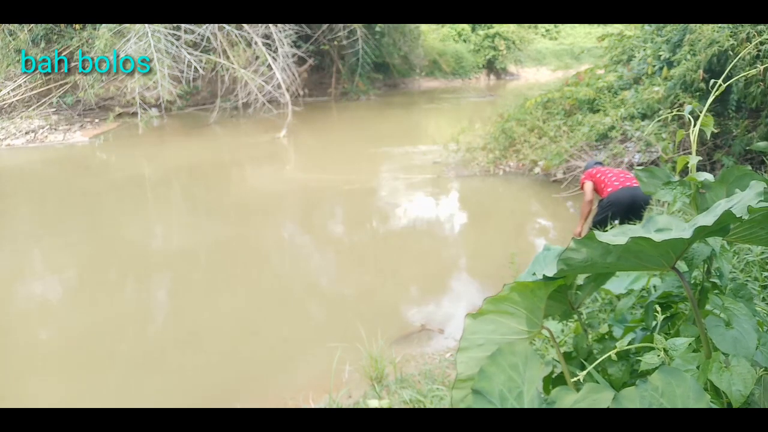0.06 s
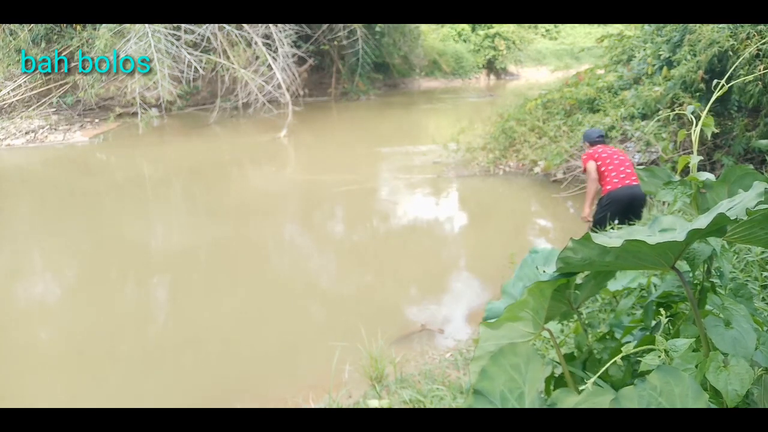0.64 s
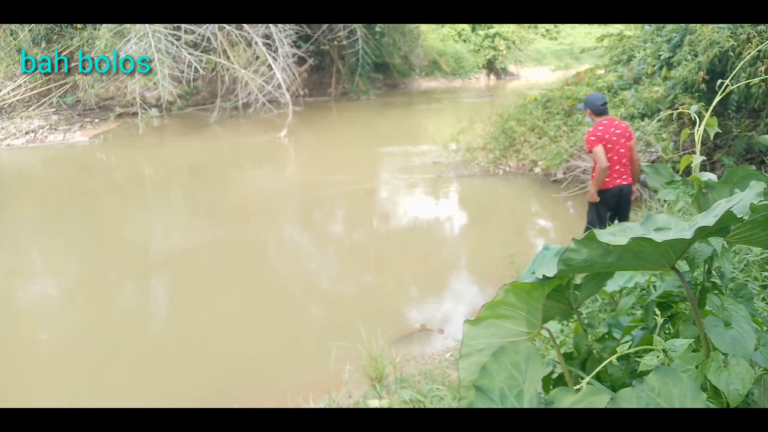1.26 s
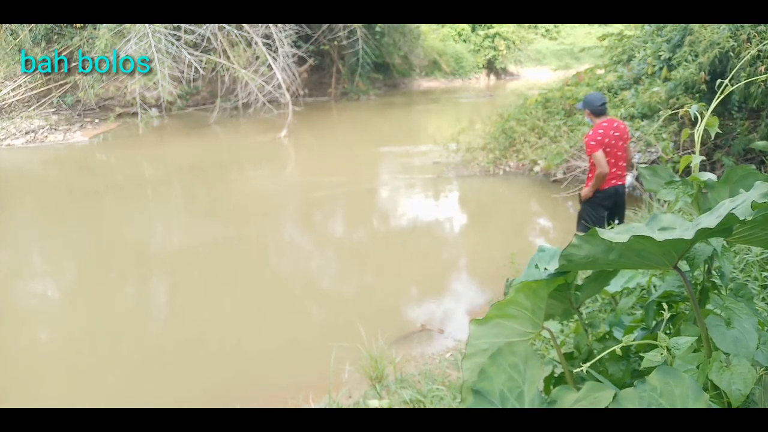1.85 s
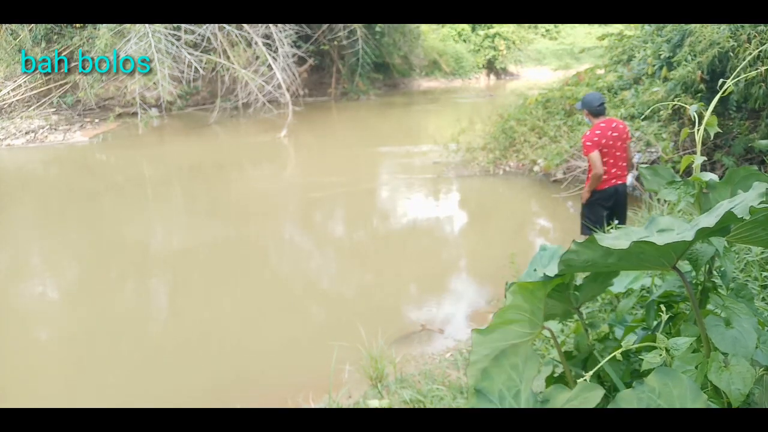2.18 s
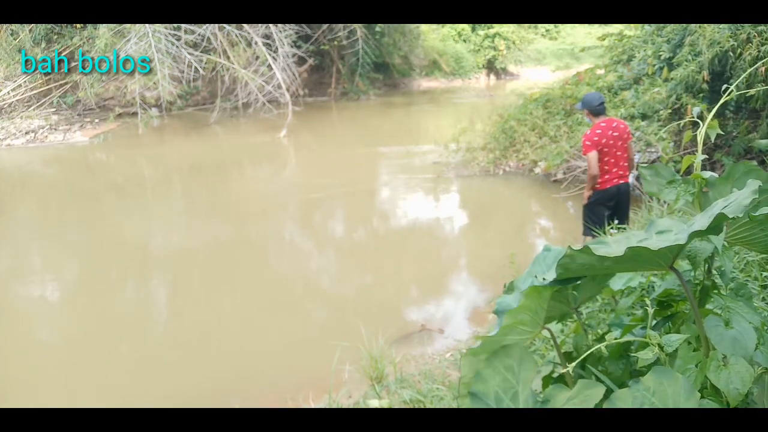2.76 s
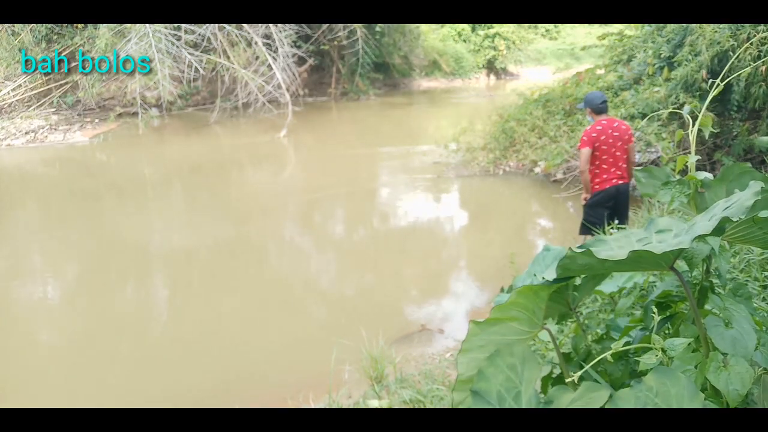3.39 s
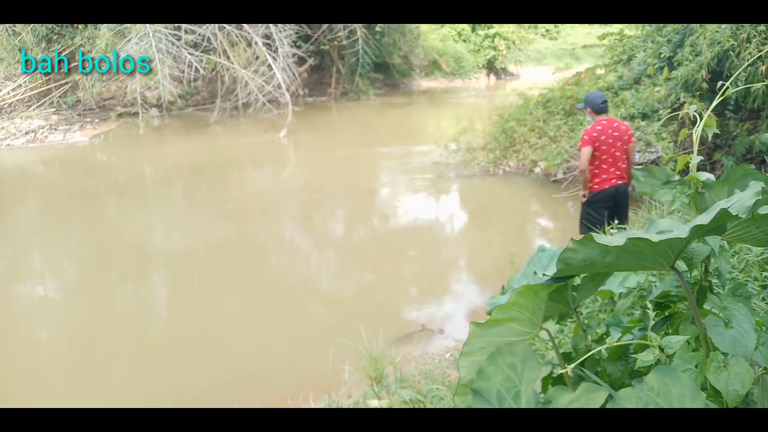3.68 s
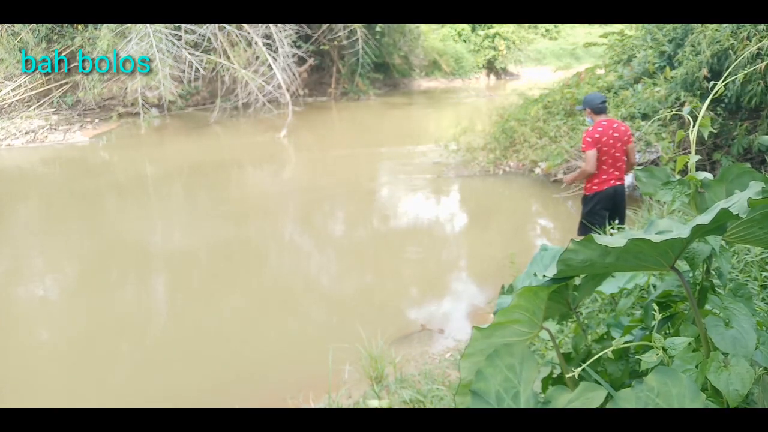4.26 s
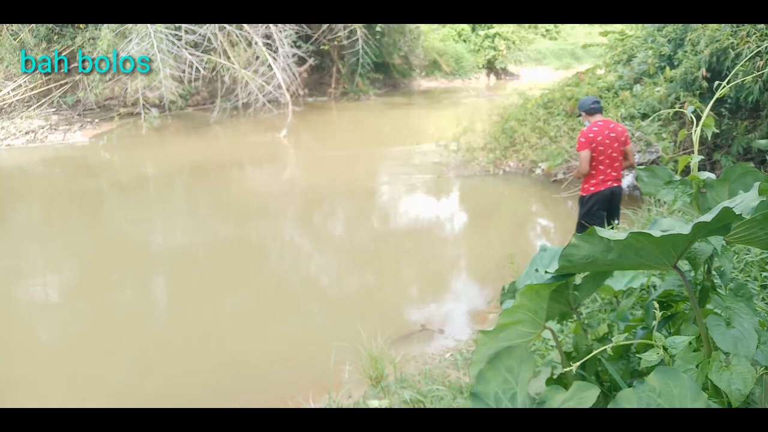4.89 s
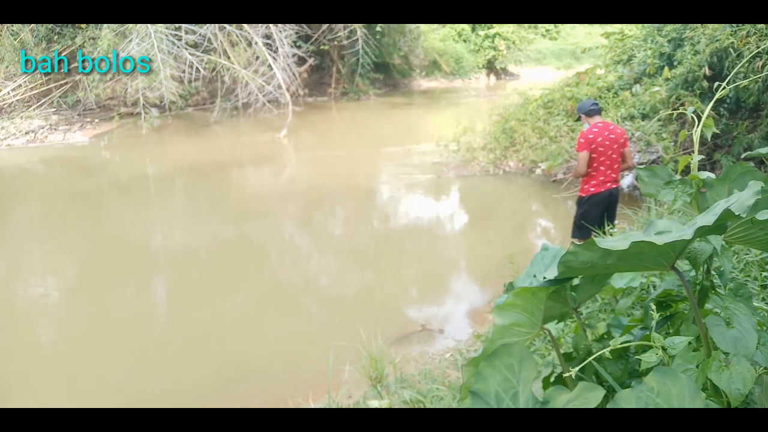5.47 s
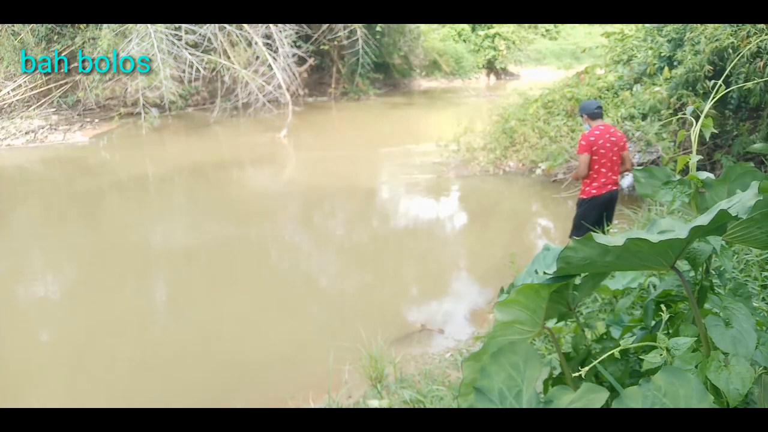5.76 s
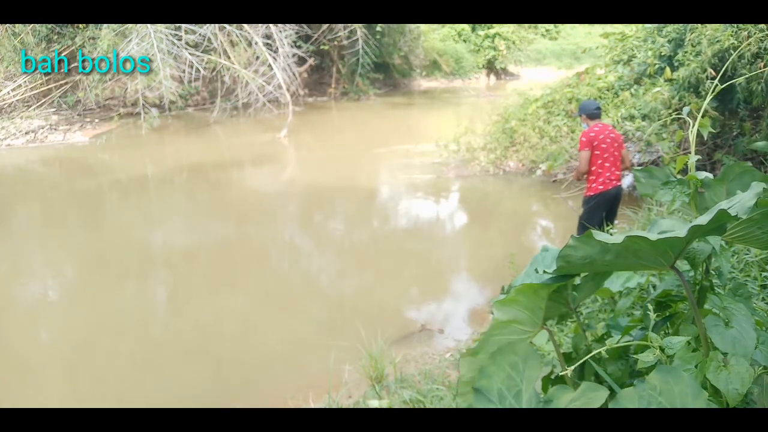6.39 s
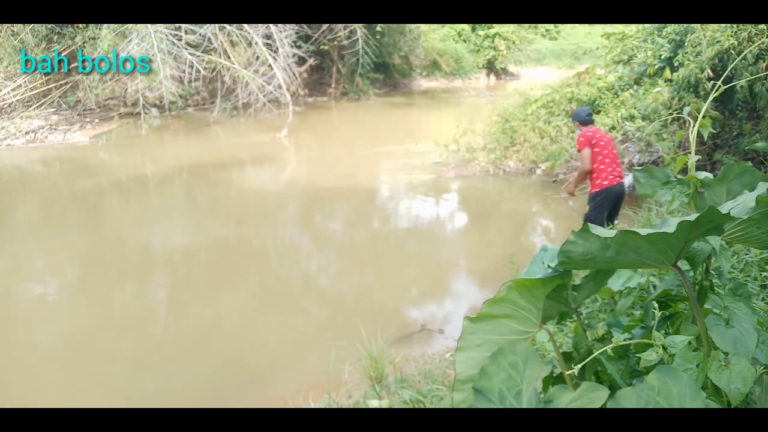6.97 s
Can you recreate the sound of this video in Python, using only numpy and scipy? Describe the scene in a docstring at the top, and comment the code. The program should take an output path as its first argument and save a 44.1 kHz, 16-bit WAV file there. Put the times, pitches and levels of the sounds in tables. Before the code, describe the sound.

A bird repeats short rising whistles by a softly hissing river, with other chirps, a tiny jingling bell and low wind rumbles.

```python
"""A bird on a wooded river bank repeats a quick downslur and a long rising whistle, both near-pure tones.
A near bird sweeps up and down, and far ones call thinly; leaves scatter the calls and trees echo them.
A pellet excites the modes of a tiny bell, likely on a fishing rod, and wind eddies buffet a phone's
two ports. Insects whine faintly. The phone's noise suppressor lets the river's hiss swell whenever
something sounds."""
import sys
import numpy as np
from scipy import signal
from scipy.fft import rfft, irfft, next_fast_len
from scipy.io import wavfile
from scipy.ndimage import uniform_filter1d

SR = 44100
rng = np.random.default_rng(int(sys.argv[2]) if len(sys.argv) > 2 else 0)


def dump_mix(stems):
    """Bounce the given channels to the path in sys.argv[1] as a 16-bit WAV at rate SR."""
    frames = np.atleast_2d(stems).T  # one column per channel
    limited = np.clip(frames, -1, 1)  # hard clip at full scale
    pcm = np.round(limited * 32767).astype(np.int16)
    wavfile.write(sys.argv[1], SR, pcm)


N = 314874
TIME = np.arange(N) / SR
FREQ = np.maximum(np.arange(N // 2 + 1) * SR / N, 1)


def undb(db):
    """Amplitude ratio of a level in decibels."""
    return 10 ** (np.asarray(db) / 20)


def unit(x):
    """Normalisation to rms 1."""
    return x / np.sqrt(np.mean(x ** 2))


def step(t, width_s):
    """Smooth transition from 0 to 1 around t = 0."""
    return (1 + np.tanh(t / width_s)) / 2


def walk(rate):
    """Random modulation of spread about 1, with a bandwidth of roughly `rate` Hz."""
    knots = rng.standard_normal(N // 40)
    return 1.35 * np.interp(TIME * rate * 2, np.arange(len(knots)), knots)


def noise(points):
    """Spectral shaping: noise of rms 1 whose spectrum follows (Hz, dB) points."""
    hz, db = np.transpose(points)
    gain = undb(np.interp(np.log(FREQ), np.log(hz), db))
    return unit(irfft(rfft(rng.standard_normal(N)) * gain, N))


def band(hz, width):
    """Resonance: narrow-band noise of rms 1."""
    return unit(irfft(rfft(rng.standard_normal(N)) / (1 + (2 * (FREQ - hz) / width) ** 2), N))


def swells(rows, attack_s, release_s):
    """Power addition: the joint envelope of (start s, length s, dB) bouts that rise, hold and decay."""
    power = np.zeros(N)
    for start, length, db in rows:
        fade = np.maximum(start - TIME, 0) / attack_s + np.maximum(TIME - start - length, 0) / release_s
        power += (undb(db) * np.exp(-np.minimum(fade, 20))) ** 2
    return np.sqrt(power)


def propagate(x, lag, wet_db, t60, early_db, early_s, pan_db):
    """Multipath propagation: direct sound, early scatter off leaves and reverberation from trees.
    The direct sound reaches the right port `lag` samples after the left, and `pan_db` weaker."""
    t = TIME[:SR * 2 // 3]
    size = next_fast_len(N + len(t), real=True)
    source, ports = rfft(x, size), []
    for side in (1, -1):
        leaves = rng.standard_normal(len(t)) * np.exp(-t / early_s) * (t > .001)
        trees = rng.standard_normal(len(t)) * undb(-60 * t / t60) * (1 - np.exp(-t / 0.018))
        paths = (undb(early_db) * unit(leaves) + undb(wet_db) * unit(trees)) / np.sqrt(len(t))
        paths[max(-side * lag, 0)] += undb(side * pan_db / 2)
        ports.append(irfft(source * rfft(paths, size), size)[:N])
    return np.array(ports)


def river():
    """Broadband noise of water and leaves, incoherent between the ports, over a coherent low murmur."""
    # Spectrum of the hiss. Each row: frequency in Hz, relative spectral density in dB.
    spectrum = [(20, -40), (45, -3), (70, 2.5), (110, -0.5), (200, -4), (310, -4), (420, -8), (700, -11.5),
                (1300, -15), (2500, -16), (3600, -17), (6000, -27.5), (9500, -29.5), (15000, -32)]
    hiss = np.array([noise(spectrum) * undb(.5 * walk(7.6)) for _ in range(2)])
    murmur = band(hz=300, width=24)
    return undb(-59) * hiss + undb(-71.5) * murmur


def insects(chirp_hz, chirp_db, chirp_s):
    """Narrow-band noise: steady whines, and one insect whose chirps are pulses of amplitude modulation."""
    # Steady whines. Each row: centre frequency in Hz, width in Hz, level in dB.
    whines = [(8490, 260, -84.5), (9400, 140, -86.5)]
    # Pace of the chirping, which slows and stops. Each row: time in seconds, chirps per second.
    pace_points = [(0, 5.35), (1.1, 4.5), (1.5, 6.5), (3.8, 5.4), (4.5, 2.7)]
    pace = np.interp(TIME, *np.transpose(pace_points))
    cycles = np.cumsum(pace) / SR
    offset_s = (cycles - np.round(cycles)) / pace
    chirps = np.exp(-(offset_s / chirp_s) ** 2) * (cycles > .5) * (TIME < pace_points[-1][0])
    ports = []
    for _ in range(2):
        whine = sum(undb(db) * band(hz, width) for hz, width, db in whines)
        ports.append(whine + undb(chirp_db) * chirps * band(chirp_hz, width=720))
    return np.array(ports)


def wind(port, trim_db):
    """Turbulent pressure on one port (0 left, 1 right): eddies rumble in gusts and peak in thumps."""
    # Spectrum of the eddies. Each row: frequency in Hz, relative spectral density in dB.
    spectrum = [(20, -31), (40, -20), (65, -4), (98, -1), (130, -7), (190, -15.5), (260, -24), (380, -44.5),
                (600, -49.5), (1200, -72.5)]
    # Gusts. Each row: start and length in seconds, left and right relative levels in dB.
    gusts = [(0.115, 0.097, -72, -39), (0.844, 0.08, -71, -43.5), (0.944, 0.053, -56, -51.5),
             (1.194, 0.44, -62, -59.5), (1.974, 0.14, -71.5, -56), (2.309, 0.033, -66, -48.5),
             (4.08, 0.54, -67, -66.5), (4.441, 0.12, -62, -51), (4.753, .11, -65, -51.5),
             (5.024, 0.24, -65, -50), (5.282, 0.53, -60, -41.5), (5.826, 0.082, -53.5, -47.5),
             (5.955, .18, -56.5, -55.5), (6.497, .11, -70, -50)]
    # Single strong eddies. Each row: time in seconds, left and right relative levels in dB.
    thumps = [(0.192, -56, -33), (1.181, -39.5, -67), (1.212, -45, -50), (1.285, -65, -43),
              (1.339, -43.5, -56), (1.393, -64, -35), (1.442, -46.5, -60), (1.542, -60, -43),
              (1.563, -42, -61), (1.595, -58, -40.5), (1.974, -74, -45.5), (2.03, -75, -43),
              (4.445, -70, -42.5), (4.856, -68, -45.5), (5.165, -64, -32), (5.299, -43, -28),
              (5.43, -61, -22), (5.464, -36, -26.5), (5.593, -43.5, -43), (5.667, -56, -35.5),
              (5.766, -60, -32)]
    thump_half_width_s = .015
    eddies = noise(spectrum)
    strength = np.sqrt(uniform_filter1d(eddies ** 2, SR // 30) + 0.012)
    bouts = [(start, length, levels[port]) for start, length, *levels in gusts]
    power = swells(bouts, attack_s=0.024, release_s=0.018) ** 2
    for at, *levels in thumps:
        near = abs(TIME - at) < .1
        pulse = np.exp(-((TIME[near] - at) / thump_half_width_s) ** 2)
        power[near] += (undb(levels[port]) * pulse) ** 2
    return eddies / strength * np.sqrt(power) * undb(trim_db)


def ring(hits):
    """Modal decay: each hit excites the bell's modes in a new mix, detuned a little by the pellet."""
    # Modes of the shell. Each row: frequency in Hz, relative level in dB, 60 dB decay time in seconds.
    modes = [(4728, -3.5, 0.17), (4840, -15.5, 0.011), (4936, 0.5, 0.041), (4952, 1, 0.038),
             (5080, -8, 0.037), (8140, -29, 0.034), (12100, -31, 0.017)]
    hz, db, t60 = np.transpose(modes)
    t, out = TIME[:SR // 12], np.zeros(N + SR)
    decays = undb(db[:, None] - 60 * t / t60[:, None]) * (1 - np.exp(-t / .0007))
    for i in np.flatnonzero(abs(hits) > undb(-80)):
        detune = 1 + .003 * rng.standard_normal(len(hz))
        mix = undb(3 * rng.standard_normal(len(hz)))
        partials = decays * np.sin(2 * np.pi * (hz * detune)[:, None] * t)
        out[i:i + len(t)] += hits[i] * (mix @ partials)
    return out[:N]


def bell():
    """Impact excitation: a pellet rattles in a small shell, each contact giving a ring and a tick."""
    # Bouts of shaking. Each row: start and length in seconds, relative level in dB.
    shakes = [(1.76, 0.049, -63.5), (1.94, 0.25, -65), (2.34, .05, -62.5), (2.64, 0.17, -67.5),
              (2.95, .26, -65.5), (3.68, 0.65, -60.5), (3.88, 0.31, -54)]
    # Hard knocks of the pellet. Each row: time in seconds, relative level in dB.
    knocks = [(1.925, -48.5), (1.9394, -53), (2.0348, -53), (2.0844, -49), (2.3545, -53), (2.6713, -50),
              (2.814, -46.5), (3.256, -50.5), (3.675, -47), (3.708, -43.5), (3.7933, -46), (3.8751, -44),
              (3.914, -40.5), (3.936, -52), (3.9525, -37.5), (4.0367, -40.5), (4.0871, -48), (4.1046, -39),
              (4.2601, -40), (4.3041, -49.5)]
    touches_per_s = 160
    touches = (rng.random(N) < touches_per_s / SR) * undb(3 * rng.standard_normal(N))
    hits = touches * swells(shakes, attack_s=.015, release_s=0.028) * undb(2.5 * walk(14) + 1.5)
    for at, db in knocks:
        hits[int(at * SR)] += undb(db)
    jingle = ring(hits) + undb(-12) * hits
    return propagate(jingle, lag=-13, wet_db=-9, t60=0.48, early_db=-6, early_s=0.0068, pan_db=1.5)


def slurs(rows, waver, edge):
    """Frequency modulation: tones glide through three pitches, loudest at the fraction `crest`."""
    out, wobble = np.zeros(N + SR), 1 + waver * walk(150)
    for start, length, start_hz, mid_hz, end_hz, db, crest in rows:
        i, progress = int(start * SR), np.linspace(0, 1, int(max(length, .01) * SR))
        parabola = np.polyfit([0, .5, 1], [start_hz, mid_hz, end_hz], 2)
        hz = np.polyval(parabola, progress) * np.resize(wobble[i:], len(progress))
        triangle = np.interp(progress, [0, np.clip(crest, .1, .9), 1], [0, 1, 0])
        swell = np.sin(np.pi / 2 * triangle) ** edge
        out[i:i + len(hz)] += undb(db) * swell * np.sin(2 * np.pi * np.cumsum(hz) / SR)
    return out[:N]


def far_birds():
    """Diffuse field: thin rises, falls and low peeps arrive with more scattered than direct sound."""
    # Kinds of note. Each entry: length in seconds, start, middle and end pitch in Hz, crest from 0 to 1.
    shapes = {"rise": (.064, 4200, 5080, 5300, 0.39), "fall": (0.079, 5600, 4800, 3400, 0.5),
              "peep": (.055, 2900, 2230, 1700, 0.46)}
    # Calls. Each row: start in seconds, kind of note, relative level in dB.
    calls = [(.6, "peep", -70), (1.298, "rise", -73), (3.426, "rise", -58), (4.429, "rise", -64.5),
             (4.65, "fall", -64), (4.872, "peep", -62), (5.018, "fall", -67), (5.355, "rise", -57.5),
             (5.72, "fall", -59.5), (6.162, "fall", -62), (6.596, "rise", -59), (7.035, "fall", -63)]
    rows = []
    for start, kind, db in calls:
        length, *pitches, crest = shapes[kind]
        rows.append((start, length, *pitches, db, crest))
    notes = undb(-3.5) * slurs(rows, waver=0.0236, edge=0.54)
    return propagate(notes, lag=-18, wet_db=2.5, t60=0.78, early_db=6.5, early_s=0.016, pan_db=-4.5)


def near_bird(throat_hz=3800):
    """Resonance: quick sweeps, even in musical pitch, are loudest near the throat's own frequency."""
    # Sweeps. Each row: start and length in seconds, start and end pitch in Hz, relative level in dB.
    sweeps = [(0.241, .035, 3470, 4400, -63), (0.958, 0.052, 4400, 5050, -61),
              (0.97, 0.037, 3610, 4000, -53), (1.519, .02, 3120, 2350, -59), (1.721, .023, 3830, 2437, -58),
              (1.877, 0.026, 3820, 2380, -54), (2.019, 0.015, 4560, 3400, -57),
              (2.129, 0.028, 2430, 4690, -47), (2.274, 0.03, 3600, 4550, -59.5),
              (2.294, 0.042, 4730, 2130, -45), (2.542, 0.045, 2707, 4230, -42),
              (2.733, .013, 4390, 3660, -54.5), (2.964, .04, 2004, 2518, -62.5),
              (3.004, .064, 2616, 5080, -46.5), (3.171, 0.031, 3755, 3340, -51.5),
              (3.658, .05, 2620, 3290, -48), (3.708, 0.069, 3497, 3981, -44.5)]
    rows = []
    for start, length, start_hz, end_hz, db in sweeps:
        mid_hz = np.sqrt(start_hz * end_hz)
        crest = np.log(throat_hz / start_hz) / np.log(end_hz / start_hz)
        rows.append((start, length, start_hz, mid_hz, end_hz, db, crest))
    notes = undb(-0.4) * slurs(rows, waver=0.015, edge=1.06)
    return propagate(notes, lag=10, wet_db=-4, t60=0.71, early_db=-1, early_s=0.016, pan_db=-1.5)


def whistling_bird():
    """Modulated pure tone: after a downslur, a whistle starts shakily, steps up, holds and flicks up."""
    # Calls. Each row: whistle start, length and lead-in length in seconds, held pitch in Hz, relative
    # level in dB, its changes at the lead-in, sag and final accent in dB, downslur relative level in dB.
    calls = [(1.301, 0.27, 0.031, 2991, -44, -14, -6.5, 5, -60.5),
             (2.506, 0.3, 0.065, 3010, -46, -9.5, -11.5, 1, -55.5),
             (3.868, 0.29, 0.06, 3033, -41.5, -18.5, 2.5, -2, -56.5),
             (5.775, 0.27, 0.077, 2970, -48, -9.5, -0.5, 13, -55.5)]
    # The downslur: head start and length in seconds, start, middle and end pitch in Hz, crest from 0 to 1.
    downslur = (.057, .028, 3180, 2255, 1975, .3)
    ahead_s, slur_s, *slur_pitches, crest = downslur
    lead_in_hz, step_s, swell_s = 2676, .016, 0.033
    sag_at_s, sag_s = .19, 0.017
    flick_s, flick_hz_per_s = .055, 3570
    accent_before_end_s, accent_s = 0.019, 0.021
    tones, slur_rows = np.zeros(N), []
    wobble, flutter = walk(70), walk(50)
    for start, length, lead_in, held_hz, level_db, lead_db, sag_db, accent_db, slur_db in calls:
        now = (TIME > start - .01) & (TIME < start + length + .01)
        t = TIME[now] - start
        flick = flick_hz_per_s * np.maximum(t - length + flick_s, 0)
        hz = lead_in_hz + (held_hz - lead_in_hz) * step(t - lead_in, step_s) + flick
        soft_start = step(lead_in + swell_s - t, swell_s)
        sag = np.exp(-((t - sag_at_s) / sag_s) ** 2)
        accent = np.exp(-((t - length + accent_before_end_s) / accent_s) ** 2)
        db = level_db + lead_db * soft_start + sag_db * sag + accent_db * accent
        gate = np.clip(np.minimum(t, length - t) / 0.0023 + 1, 0, 1)
        shaky = 1 + 3 * np.exp(-(t / 0.049) ** 2)
        phase = 2 * np.pi * np.cumsum(hz * (1 + 0.0033 * shaky * wobble[now])) / SR
        tones[now] += gate * undb(db + 1.83 * np.sqrt(shaky) * flutter[now]) * np.sin(phase)
        slur_rows.append((start - ahead_s, slur_s, *slur_pitches, slur_db, crest))
    whistles = propagate(undb(-1) * tones, lag=-19, wet_db=-10.5, t60=0.56,
                         early_db=-13, early_s=0.015, pan_db=-4)
    glides = slurs(slur_rows, waver=0.047, edge=0.25)
    return whistles + propagate(glides, lag=-19, wet_db=-6, t60=1, early_db=5, early_s=0.036, pan_db=.5)


def scene():
    """Superposition of birds, bell, insects and river, with independent wind on each port."""
    buffeting = np.array([wind(port=0, trim_db=1.5), wind(port=1, trim_db=1.24)])
    birds = whistling_bird() + near_bird() + far_birds()
    return birds + bell() + insects(chirp_hz=14900, chirp_db=-68.5, chirp_s=0.023) + river() + buffeting


def suppress(x, shut_db, open_db, depth_db, window_s):
    """Downward expansion: the gain falls while the input level stays near the noise floor."""
    power = uniform_filter1d(np.mean(x ** 2, axis=0), int(window_s * SR))
    level_db = 10 * np.log10(power + 1e-12)
    opening = np.clip((level_db - shut_db) / max(open_db - shut_db, 1), 0, 1)
    return x * undb(depth_db * (1 - uniform_filter1d(opening, SR // 40)))


def record(dry):
    """Expansion and band limiting: the phone turns quiet stretches down and cuts the highest treble."""
    cutoff_hz = 15550
    expanded = suppress(dry, shut_db=-60, open_db=-49.5, depth_db=-9, window_s=0.059)
    lowpass = signal.ellip(10, .1, 60, cutoff_hz, fs=SR, output="sos")
    return signal.sosfiltfilt(lowpass, expanded)


dry = scene()
out = record(dry)
dump_mix(out)
```